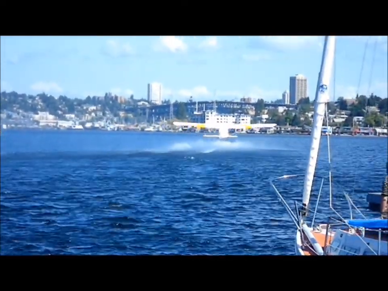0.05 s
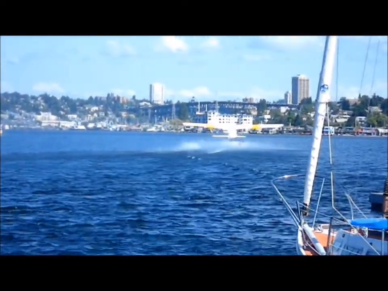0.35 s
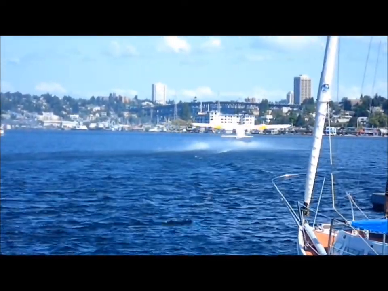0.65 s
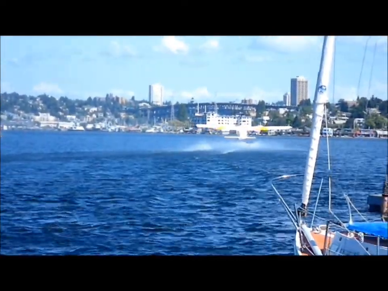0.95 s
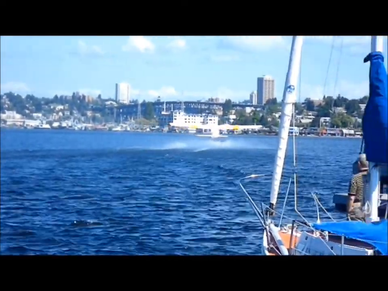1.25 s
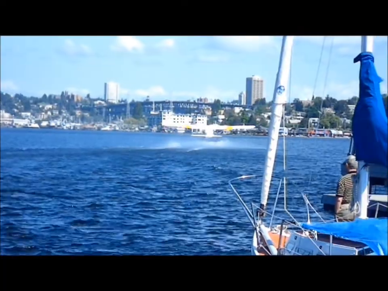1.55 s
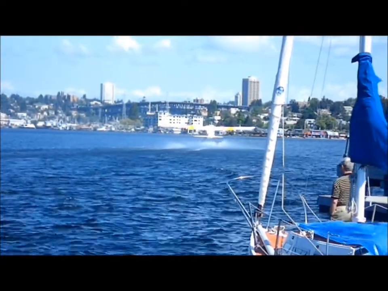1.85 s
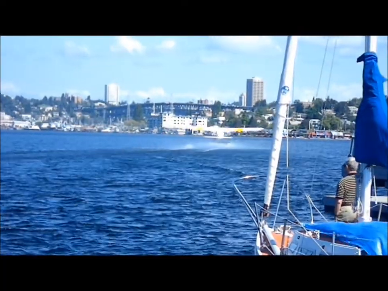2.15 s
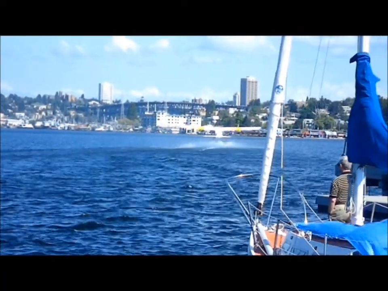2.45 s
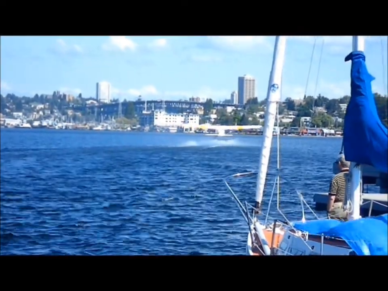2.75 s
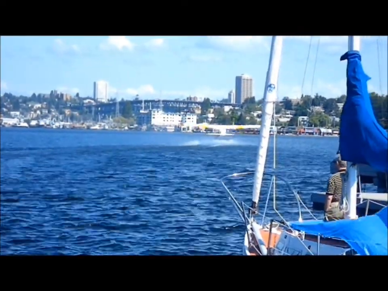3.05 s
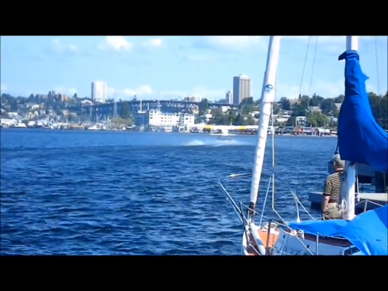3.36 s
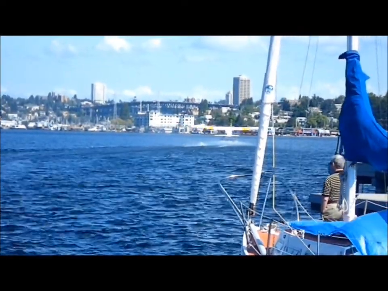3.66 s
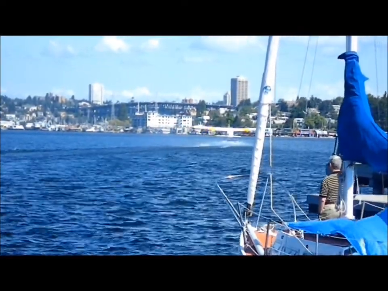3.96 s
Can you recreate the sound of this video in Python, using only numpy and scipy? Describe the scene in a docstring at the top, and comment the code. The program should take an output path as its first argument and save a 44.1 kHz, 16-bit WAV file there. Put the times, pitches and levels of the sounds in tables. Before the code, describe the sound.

A distant floatplane roars at full power across a lake, its propeller drone swelling and fading. Close by on a sailboat, rigging ticks lightly over faint ripples, and wind increasingly buffets the microphone in the second half.

```python
"""Floatplane across a lake

A distant floatplane at full power is heard from a sailing boat. Its propeller and exhaust tones swell and fade
over the water; the shores return them Doppler-shifted, smeared into a roar. Gusts buffet the microphone, mostly
in the second half, while ripples fizz, water drops and splashes tick and the rigging squeaks close by."""
import sys
import numpy as np
from scipy import signal
from scipy.fft import rfft, irfft
from scipy.io import wavfile
from scipy.ndimage import uniform_filter1d

SR = 44100
rng = np.random.default_rng(int(sys.argv[2]) if len(sys.argv) > 2 else 0)


def put_to_file(sound):
    """Save the sound as 16-bit audio at rate SR, in the file named by the first command-line argument."""
    columns = np.atleast_2d(sound).T  # one column per channel
    safe = np.clip(columns, -1, 1)
    whole_steps = np.round(safe * 32767)
    wavfile.write(sys.argv[1], SR, whole_steps.astype(np.int16))


N = 176400
TIME = np.arange(N) / SR
RECEDE_DB_PER_S = 2.5


def amp(db):
    """Amplitude ratio of a level in decibels."""
    return 10 ** (np.asarray(db) / 20)


def unit(x):
    """Normalisation to an rms of 1."""
    return x / np.sqrt(np.mean(abs(x) ** 2) + 1e-20)


def curve(points):
    """Linear interpolation of (time_s, value) rows at every sample."""
    return np.interp(TIME, *np.transpose(points))


def colour(points, hz):
    """Spectral gain from (frequency_hz, level_db) rows, interpolated in log frequency."""
    corner_hz, db = np.transpose(points)
    return amp(np.interp(np.log(hz + 1), np.log(corner_hz), db))


def add(mix, start_s, sound):
    """Superposition of a sound on the mix."""
    part = mix[max(round(start_s * SR), 0):][:len(sound)]
    part += sound[:len(part)]


def drift(rate_hz):
    """Slow random fluctuation: low-passed Gaussian noise with an rms near 1."""
    count, control_hz = 4096, 500
    hz = np.fft.rfftfreq(count, 1 / control_hz)
    slow = unit(irfft(rfft(rng.standard_normal(count)) * np.exp(-(hz / rate_hz) ** 2)))
    return np.interp(TIME, np.arange(count) / control_hz, slow)


def noise(spectrum, patchy_db):
    """Coloured noise of rms 1, modulated in random patches of time and frequency."""
    hz = np.fft.rfftfreq(2048, 1 / SR)
    real, imag, patches = rng.standard_normal((3, N // 512 + 6, len(hz)))
    patches = uniform_filter1d(patches, size=8, axis=0)
    patches = unit(uniform_filter1d(patches, size=12, axis=1))
    frames = (real + 1j * imag) * colour(spectrum, hz) * amp(patchy_db * patches)
    return unit(signal.istft(frames.T, nperseg=2048, noverlap=1536)[1][:N])


def ripples():
    """Many small splashes nearby sum incoherently to a faint fizz."""
    # ripple spectrum: frequency_hz, relative_db
    spectrum = [(1000, -28), (3000, -5), (6000, -6), (9500, -1), (12000, -0.5), (15000, 2)]
    return amp(-68 + 1.6 * drift(30)) * noise(spectrum, patchy_db=5.0)


def wind():
    """Turbulent pressure on the microphone makes a rumble; strong gusts reach higher in pitch."""
    # gust strength: time_s, relative_db
    gusts = [(0, -38), (.5, -39), (.92, -40), (.98, -30), (1.05, -41), (1.68, -39), (1.75, -28),
             (1.92, -28), (2.04, -24), (2.13, -35), (2.28, -32), (2.33, -27), (2.44, -26), (2.52, -37),
             (2.85, -35), (3.11, -28), (3.22, -34), (3.29, -29), (3.38, -32), (3.47, -28), (3.63, -32),
             (3.71, -27), (4, -27)]
    # spectra of the wind and of hard gusts: frequency_hz, relative_db
    rumble_spectrum = [(12, -29), (25, -48), (45, 6.5), (90, 5), (160, 1), (240, -9), (400, -28),
                       (900, -41), (4000, -60)]
    buffet_spectrum = [(60, -18), (130, -1), (230, -2.5), (330, -15), (600, -34), (3000, -70)]
    gust_db = curve(gusts) + 2.2 * drift(18)
    rumble = noise(rumble_spectrum, patchy_db=1.0) * amp(gust_db + 3.0)
    buffet_db = -27.5 + 1.7 * np.minimum(gust_db + 23.5, 2)
    return rumble + noise(buffet_spectrum, patchy_db=3.0) * amp(buffet_db)


def tick(peak_db, centre_hz, width_octaves, t60_s):
    """A damped transient: band-limited noise decays exponentially, leaving a faint rattle."""
    t = np.arange(4096) / SR
    hz = np.fft.rfftfreq(len(t), 1 / SR) + 1
    decay = amp(-60 * t / t60_s) + amp(-32 - 60 * t / 0.11)
    burst = np.roll(rng.standard_normal(len(t)) * decay, 32)  # room for the filter's pre-ringing
    resonance = 1 / (1 + (np.log2(hz / centre_hz) / width_octaves) ** 2)
    band = resonance / (1 + (hz / 15000) ** 4) / (1 + (1700 / hz) ** 4)
    snap = irfft(rfft(burst) * band)
    return amp(peak_db) * snap / abs(snap).max()


def ping(level_db, pitch_hz, t60_s):
    """Two close modes of a small fitting beat as they decay."""
    t = np.arange(SR // 4) / SR
    modes = np.sin(2 * np.pi * pitch_hz * t) + 0.92 * np.sin(2 * np.pi * pitch_hz * 1.025 * t)
    attack = np.minimum(t / .003, 1)
    return amp(level_db - 60 * t / t60_s) * attack * modes / 2


def squeak(length_s=.17, pitch_sag=.075):
    """Frequency modulation: the partials of a faint squeak waver and glide down together."""
    # squeak partials: starting_pitch_hz, level_db
    partials = [(2230, -43), (1925, -43)]
    progress = np.arange(0, 1, 1 / (length_s * SR))
    glide = np.cumsum(1 - pitch_sag * progress + 0.0067 * drift(40)[:len(progress)]) / SR
    swell = np.sqrt(np.sin(np.pi * progress))
    return swell * sum(amp(db) * np.sin(2 * np.pi * hz * glide) for hz, db in partials)


def drops(faint_ticks=56):
    """Brief sounds close by superpose: ticks of water drops and splashes, ringing fittings and one squeak of
    the rigging."""
    # distinct ticks: start_s, peak_db, centre_hz, width_octaves, t60_s
    ticks = [(.155, -44, 9500, .4, .006), (.214, -34, 9500, .4, .008), (.226, -41, 9500, .3, .008),
             (.234, -37, 9000, .6, .03), (.262, -32.5, 6000, 0.23, .008), (.777, -34, 7980, 0.36, .012),
             (.8, -38, 5000, .25, .015), (1.058, -38, 9490, 0.24, .01), (1.304, -36.5, 9990, .3, .015),
             (1.391, -39, 8990, .2, .008), (1.432, -26, 8900, 0.66, .02), (1.44, -28, 10500, .4, .018),
             (1.449, -27, 7200, .2, .02), (1.469, -30.5, 11000, 0.49, .01), (1.604, -30, 6010, 0.59, .008),
             (2.081, -33, 10000, .7, .003), (2.108, -32.5, 8506, 0.39, .006),
             (2.125, -29, 9510, 0.59, .004), (2.13, -28, 4000, .9, .006), (2.19, -25, 10900, 0.41, .004),
             (2.253, -34, 11800, 0.21, .008), (2.365, -35.5, 9026, .3, .008),
             (2.385, -39, 7993, 0.41, .006), (2.426, -48, 11100, .5, .004), (2.44, -25, 5440, .6, .012),
             (2.615, -42, 10000, 0.38, .006), (2.85, -30.5, 6180, .5, 0.0098),
             (3.078, -38, 6490, 0.29, .01), (3.405, -39, 6000, 0.91, .06), (3.629, -31, 8995, .4, .006),
             (3.6505, -19, 5400, .8, .004), (3.6534, -26, 11000, 1, .003),
             (3.656, -18.5, 4900, 0.74, 0.0071), (3.706, -36, 9400, .25, .008),
             (3.786, -44, 12000, .4, .006), (3.82, -29, 6310, .2, .01)]
    # ringing fittings: start_s, level_db, pitch_hz, t60_s
    pings = [(1.093, -30, 1670, .13), (3.41, -28, 4770, 0.037), (3.826, -43, 4792, 0.099)]
    out = np.zeros(N)
    for start_s, *shape in ticks:
        add(out, start_s, tick(*shape))
    for when, size, pitch in rng.random((faint_ticks, 3)):
        faint = tick(-52 + 11 * size ** 2, 6500 + 3500 * pitch, width_octaves=0.28, t60_s=0.011)
        add(out, when * N / SR, faint)
    for start_s, *shape in pings:
        add(out, start_s, ping(*shape))
    add(out, start_s=.13, sound=squeak())
    return out


def roar(blade_cycles):
    """Broadband noise: exhaust rush, amplitude-modulated by the blades, and the hiss of spray."""
    # spectra of rush and spray: frequency_hz, relative_db
    rush_spectrum = [(20, -30), (45, -15), (90, -1), (140, 1.5), (250, 2.5), (400, -5.5), (520, -7.5),
                     (800, -9), (1100, -12.5), (1500, -19), (2200, -26.5), (4000, -53), (16000, -78)]
    hiss_spectrum = [(300, -38), (1000, -2.5), (1800, -1.5), (2400, -2), (3200, -1), (4200, -7),
                     (5500, -11), (7000, -15.5), (9000, -19.5), (11000, -27.5), (15000, -30.5)]
    # their envelopes: time_s, relative_db
    rush_levels = [(0, -29.5), (1.35, -29), (1.68, -27), (1.92, -34.5), (2.45, -33.5), (3.28, -31.5),
                   (3.5, -34.5), (4, -34)]
    hiss_levels = [(0, -45), (.22, -43), (.45, -45), (.8, -45), (1.3, -44.5), (1.68, -43), (1.95, -50.5),
                   (2.22, -48), (2.45, -49.5), (2.9, -47.5), (3.25, -48.5), (3.55, -50.5), (4, -52)]
    throb = 1 + 0.16 * np.cos(2 * np.pi * blade_cycles)
    rush = noise(rush_spectrum, patchy_db=0.65) * amp(curve(rush_levels) + 4.0 + 0.17 * drift(20))
    hiss = noise(hiss_spectrum, patchy_db=0.95) * amp(curve(hiss_levels) + 1.5 + .5 * drift(54))
    return throb * rush + hiss


def shores(blade_cycles, count=12, doppler_spread=.08):
    """Each stretch of shore reflects the engine at its own Doppler shift, smearing tones into bands."""
    # reflected tones: blade_rate_ratio, relative_db
    tones = [(1.97, -27.5), (2.96, -30.5), (3.3, -37.5), (3.6, -39.5), (3.95, -37), (4.95, -42),
             (5.92, -39), (6.9, -42.5), (7.9, -42.5), (8.85, -45)]
    out = np.zeros(N)
    for shift in 1 + doppler_spread * (np.arange(count) + rng.random(count)) / count:
        echo = sum(amp(db) * np.cos(2 * np.pi * (ratio * shift * blade_cycles + rng.random()))
                   for ratio, db in tones)
        out += echo * (1 + .5 * drift(4.2))
    return amp(-1.0 - RECEDE_DB_PER_S * TIME) * out * np.sqrt(2 / count)


def tone(cycles, flutter, rate_hz):
    """Scintillation: moving air shakes the amplitude and phase of a tone."""
    air = 1 + flutter * (drift(rate_hz) + 1j * drift(rate_hz))
    carrier = np.exp(2j * np.pi * (cycles + rng.random()))
    return (unit(air) * carrier).real * np.sqrt(2)


def engine(blade_cycles, exhaust_ratio=1.476):
    """Periodic blade and exhaust pulses radiate tones; the upper ones fade as the aircraft recedes."""
    # envelopes of the blade tone and exhaust note: time_s, level_db
    blade_levels = [(0, -20), (.15, -17), (.3, -17.5), (.44, -27), (.55, -18.5), (.68, -15), (.8, -17.5),
                    (1, -34), (1.2, -17.5), (1.31, -22), (1.37, -33), (1.47, -24), (1.65, -20.5),
                    (1.88, -22), (2.14, -40), (2.29, -19), (2.85, -19.5), (3.05, -23), (3.22, -32),
                    (3.28, -23), (3.38, -31), (3.55, -25), (3.78, -29), (3.86, -21), (4, -22)]
    exhaust_levels = [(0, -29), (.12, -20), (.4, -29), (.6, -24), (.98, -26), (1.18, -53), (1.3, -28.5),
                      (1.5, -26.5), (1.72, -21.5), (2, -32), (2.3, -31), (2.43, -25), (2.68, -36.5),
                      (2.9, -25.5), (3.2, -20.5), (3.45, -26), (3.7, -27.5), (4, -45)]
    # upper engine tones: blade_rate_ratio, relative_db
    tones = [(1.805, -35), (2.015, -27), (2.648, -31), (2.96, -39.5), (3.665, -36), (4.23, -45.5),
             (4.34, -44.5), (5.17, -46.5), (6.32, -46.5), (7.02, -49), (7.16, -42.5), (8.18, -49.5),
             (8.45, -59)]
    blade = amp(curve(blade_levels)) * tone(blade_cycles, flutter=0.11, rate_hz=28)
    exhaust = amp(curve(exhaust_levels)) * tone(blade_cycles * exhaust_ratio, flutter=.12, rate_hz=9.4)
    upper = sum(amp(db) * tone(blade_cycles * ratio, flutter=0.12 * ratio, rate_hz=0.94 * ratio)
                for ratio, db in tones)
    return blade + exhaust + amp(1.5 - RECEDE_DB_PER_S * TIME) * upper


def scene():
    """Pressures from the aircraft, wind, water and boat add at one microphone."""
    # blade-passing frequency: time_s, rate_hz
    blade_rate = [(0, 111.5), (.6, 110.8), (1.2, 110.3), (1.6, 109.7), (2.6, 109.6), (4, 110.2)]
    blade_cycles = np.cumsum(curve(blade_rate)) / SR
    water = ripples()
    aircraft = engine(blade_cycles) + shores(blade_cycles) + roar(blade_cycles)
    return (aircraft + wind() + water + drops())[None]


def record(dry, bass_hz=24, notch_hz=7870, notch_depth=0.81, edge_hz=15350):
    """The microphone's frequency response: bass roll-off, a narrow treble notch, a steep band limit."""
    high_passed = signal.sosfilt(signal.butter(2, bass_hz, "high", fs=SR, output="sos"), dry)
    notched = signal.lfilter(*signal.iirnotch(notch_hz, Q=8, fs=SR), high_passed)
    coloured = high_passed + notch_depth * (notched - high_passed)
    band_limit = signal.firwin(151, edge_hz, window=("kaiser", 9), fs=SR)
    return signal.oaconvolve(coloured, band_limit[None], "same")


dry = scene()
out = record(dry)
put_to_file(out)
```